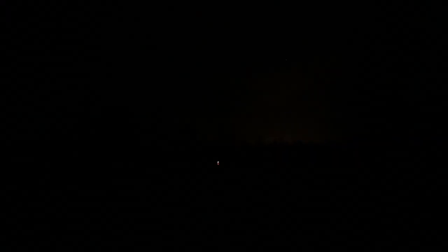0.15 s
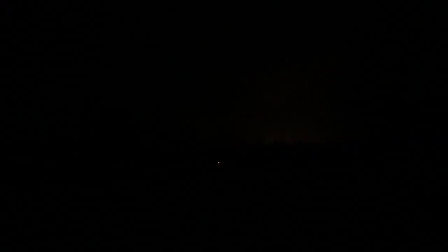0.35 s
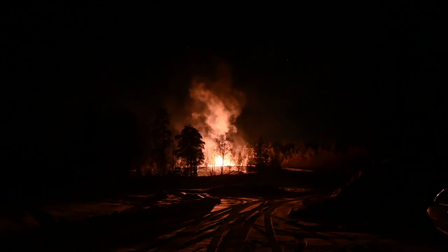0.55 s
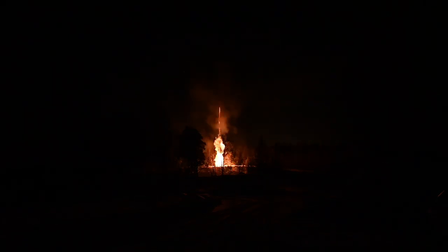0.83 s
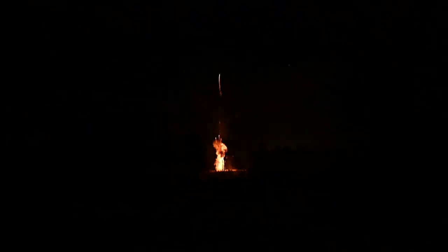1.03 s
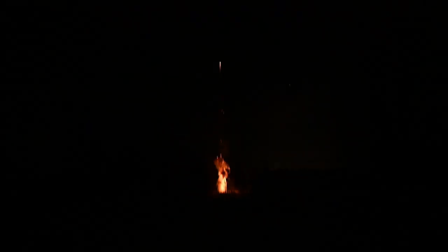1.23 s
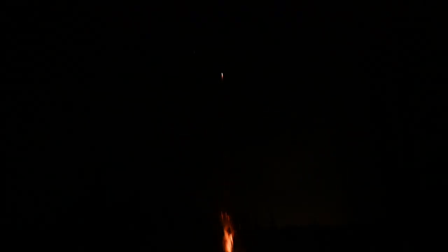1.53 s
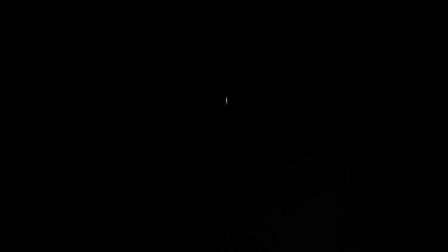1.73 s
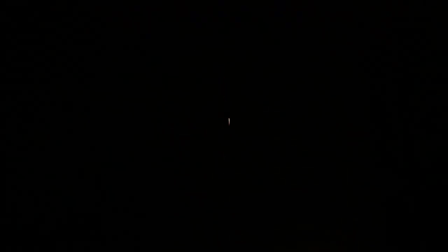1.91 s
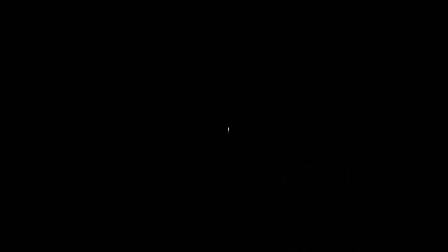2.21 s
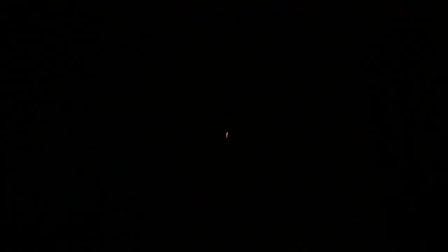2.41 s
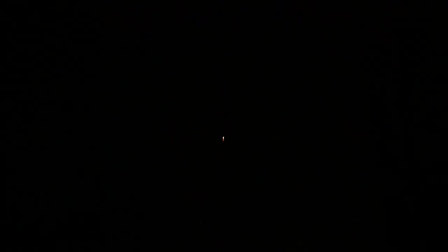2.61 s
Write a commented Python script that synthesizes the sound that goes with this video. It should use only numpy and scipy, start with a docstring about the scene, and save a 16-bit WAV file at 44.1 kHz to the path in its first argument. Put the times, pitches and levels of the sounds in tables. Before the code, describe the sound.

Firework shell launch over an open night field. Quiet low wind and faint hiss; small pops near 0.5 s, a fuse sizzle swelling to a dry, sharp crack at 0.64 s, its dull echo rolling back by 0.9 s. A low thump at 1.06 s leads into a brief, hollow, distorted blast at 1.1 s, with momentary dropouts and pops until 1.2 s. Loud, uneven rumble continues to 2.7 s, losing treble, with faint ticks.

```python
"""Firework shell leaving its mortar

A large shell is fired across an open field at night. Short pops (damped rings) and the sizzle of the fuse (coloured
noise) lead to a sharp crack (one steep pressure cycle) with a ringing tail, which rolls back from the field. After a
low thump the lift blast (a ringing tube under a roar of gas) overloads the microphone; the level drops out twice for
a moment, and a rumble of noise echoes rolls on, slowly losing its treble. Low wind rumble and faint hiss lie below."""
import sys
import numpy as np
from scipy import signal
from scipy.fft import rfft, irfft
from scipy.io import wavfile
from scipy.ndimage import uniform_filter1d

SR = 44100
rng = np.random.default_rng(int(sys.argv[2]) if len(sys.argv) > 2 else 0)


def unload_wav(signal):
    """Save mono or channel-first audio to the path in sys.argv[1] as 16-bit WAV at rate SR, clipped to [-1, 1]."""
    wavfile.write(
        sys.argv[1],
        SR,
        np.round(np.clip(np.atleast_2d(signal).T, -1, 1) * 32767).astype(np.int16),
    )


N = 121275  # samples, 2.75 s


def undb(db):
    """Amplitude ratio of a level: 20 dB per factor of ten."""
    return 10 ** (np.asarray(db) / 20)


def seconds():
    """Time axis in seconds: sample index over sampling rate."""
    return np.arange(N) / SR


def curve(rows, col=1):
    """Linear interpolation in time of one table column; column 0 holds the seconds."""
    rows = np.array(rows)
    return np.interp(seconds(), rows[:, 0], rows[:, col])


def walk(rate):
    """Slow random modulation: levels held for 1 / rate seconds, smoothed by two moving averages."""
    hold = int(SR / rate)
    steps = np.repeat(rng.standard_normal(N // hold + 1), hold)
    smooth = uniform_filter1d(uniform_filter1d(steps, hold), hold)
    return 1.3 * smooth[:N]


def band(hz, octaves):
    """Band noise: white noise under a Gaussian window on the log-frequency axis, scaled to rms 1."""
    f = np.maximum(np.arange(N // 2 + 1) * SR / N, 1)
    window = np.exp(-(np.log2(f / hz) / octaves) ** 2 * 2)
    noise = irfft(rfft(rng.standard_normal(N)) * window, N)
    return noise / np.std(noise)


def coloured(tone, flicker_db, rate, treble_db=0., bass_db=0.):
    """Spectral synthesis: half-octave noise bands follow a colour table and flicker independently."""
    treble_hz, bass_hz = 3470, 250  # treble_db applies in full at treble_hz, bass_db below bass_hz
    tilt_power = 0.97  # the treble tilt in dB grows as this power of frequency
    tone = np.array(tone)
    out, power = 0, 0
    for hz in 28 * 2 ** np.arange(0, 9.4, .5):
        density_db = np.interp(np.log(hz), np.log(tone[:, 0]), tone[:, 1], -99, -99)
        gain = undb(density_db) * np.sqrt(hz)  # bandwidth is proportional to frequency
        tilt_db = bass_db if hz < bass_hz else treble_db * min(hz / treble_hz, 2.8) ** tilt_power
        out = out + gain * undb(tilt_db + flicker_db * walk(rate)) * band(hz, .5)
        power = power + gain ** 2
    return out / np.sqrt(power)


def blast():
    """Tube resonance: the mortar rings, its pitch dropping and steadying as the shell clears the tube."""
    start_s, length_s, rise_s, fall_s = 1.0985, .036, .010, .006
    tube_hz, tube_end_hz, settle_s = 590, 405, .020  # nominal pitches, and when the change is halfway
    wobble = .33  # depth of the random pitch deviation
    gas_hz, gas_db = 1460, -9  # the roar, before its unsteady weighting
    thump_hz, thump_db = 213, -9.5
    t = seconds() - start_s
    wild = 1 / (1 + np.exp(np.clip((t - settle_s) / .003, -30, 30)))  # from 1 to 0 as the pitch settles
    hz = tube_end_hz + (tube_hz - tube_end_hz) * wild
    hz = hz * np.exp(wobble * (.2 + wild) * walk(500))
    ring = np.sin(2 * np.pi * np.cumsum(hz) / SR)
    gas = (0.3 + wild) * undb(gas_db + 4.7 * walk(200)) * band(gas_hz, 1.26)
    thump = undb(thump_db) * band(thump_hz, 0.97)
    shape = np.clip(t / rise_s, 0, 1) * np.clip((length_s - t) / fall_s, 0, 1)
    return shape ** 2 * (ring + gas + thump)


def crack():
    """Pressure pulse: a single steep cycle, rarefaction first, over in under a millisecond."""
    start_s, level_db, cycle_hz = .64432, 6, 1350  # level before overload
    turn = np.clip((seconds() - start_s) * cycle_hz, 0, 1)
    return -undb(level_db) * np.sin(2 * np.pi * turn) * (1 - .3 * turn)


def pops():
    """Damped resonance: short pops, the crack's ringing tail and a low thump, each dip first with a noisy tail."""
    # Each row: start in seconds, ring level in dB before decay and overload, pitch in Hz, ring t60 in seconds,
    # tail level in dB before decay, tail t60 in seconds, tail centre in Hz.
    pop_rows = [(0.4873, -14.5, 2660, 0.0073, -32, 0.074, 2220), (0.5565, -24, 2900, .004, -53, .04, 3000),
                (.6452, -15.5, 560, 0.025, -17.5, 0.11, 1300),
                (0.7143, -12, 1410, 0.0056, -33.5, 0.037, 1800),
                (1.0631, 1.5, 444.4, 0.013, -19.5, 0.044, 1500), (1.1725, -5, 1210, 0.0039, -40, .02, 1500),
                (1.1902, 5.5, 1120, 0.0051, -24, 0.011, 4000)]
    tail_octaves, rise_cycles = 1.75, 0.24
    out = np.zeros(N)
    for s, db, hz, ring_s, tail_db, tail_s, tail_hz in pop_rows:
        t = np.maximum(seconds() - s, 0)
        rise = 1 - np.exp(-t * hz / rise_cycles)
        out += -rise * undb(db - 60 * t / ring_s) * np.sin(2 * np.pi * hz * t)
        out += rise * undb(tail_db - 60 * t / tail_s) * band(tail_hz, tail_octaves)
    return out


def sizzle():
    """Combustion noise: the fuse burns into the charge as coloured noise of changing level and treble."""
    # Each row: time in seconds, level in dB, treble lift in dB.
    burn = [(.53, -53.5, -1), (.574, -49, 0), (.581, -43.5, 2.5), (.603, -44.5, 4), (.612, -29.5, -4),
            (.626, -28.5, 2.5), (.634, -32, -4), (.642, -14, -4), (.646, -60, 1)]
    # Each row: frequency in Hz, spectral density in dB per Hz (relative).
    burn_tone = [(400, -20), (600, 0), (1100, 8), (2500, 0.5), (5500, -10), (8000, -24), (12000, -22),
                 (15800, -36.5)]
    return undb(curve(burn)) * coloured(burn_tone, 2.8, 200, curve(burn, col=2))


def roll(rows, tone):
    """Diffuse reflection: echoes too dense to separate are noise whose level and tilt follow a table."""
    surge_db, flicker_db = 0.58, 1.14  # random swing of the whole, and of each band
    t, mean = seconds(), np.mean(rows, axis=0)
    fade_in = np.clip((t - rows[0][0]) / .02 + 1, 0, 1)
    fade_out = np.clip((rows[-1][0] - t) / .02 + 1, 0, 1)
    treble_db = curve(rows, col=2) - mean[2]  # the tone table already holds the mean colour
    bass_db = curve(rows, col=3) - mean[3]
    noise = coloured(tone, flicker_db, 15, treble_db, bass_db)
    return fade_in * fade_out * undb(curve(rows) + surge_db * walk(29.8)) * noise


def blast_roll():
    """Air absorption: the echoes of the blast grow duller with distance as air takes the treble."""
    # Each row: time in seconds, level in dB, treble and bass in dB against that level.
    echoes = [(1.15, -31.5, -8, -1.5), (1.188, -22, -9, -11), (1.296, -18, -12.5, -22.5),
              (1.398, -18, -18.5, -18), (1.556, -18, -19, -17), (1.61, -16, -22, -30),
              (1.622, -19.5, -22, -15.5), (1.646, -16.5, -21, -20.5), (1.738, -19, -21.5, -21),
              (1.808, -15, -27, -24), (1.87, -18, -24, -21), (2.048, -18.5, -30.5, -17),
              (2.102, -17, -31, -24), (2.194, -19.5, -28.5, -17), (2.288, -15.5, -34, -11),
              (2.434, -17, -40.5, -14.5), (2.62, -14, -36.5, -18.5), (2.668, -23, -29.5, -10),
              (2.682, -15.5, -38, -19), (2.74, -19, -38, -8.5)]
    # Each row: frequency in Hz, spectral density in dB per Hz (relative).
    echo_tone = [(60, -46), (100, -19.5), (190, -9.5), (280, 1), (470, -0.5), (800, -3.5), (1200, -8.5),
                 (2300, -23), (5000, -49.5), (12000, -92.5), (16000, -92.5)]
    return roll(echoes, echo_tone)


def crack_roll():
    """Reverberation in the open: the crack rolls back from the field as dense echoes."""
    # Each row: time in seconds, level in dB, treble and bass in dB against that level.
    echoes = [(.69, -37.5, -15.5, -17), (.74, -37.5, -1, -3), (.8, -28.5, -4, 2), (.87, -22, -9.5, 2),
              (.95, -23, -11.5, -19), (1.04, -24, -16.5, 8), (1.075, -30, -11.5, 0),
              (1.095, -27, -18.5, -2)]
    # Each row: frequency in Hz, spectral density in dB per Hz (relative).
    echo_tone = [(150, -27), (250, -16.5), (518, -1), (746, -4), (1150, -6), (1280, -10.5), (1840, -9.5),
                 (4300, -30), (8760, -66.5), (15800, -74)]
    return roll(echoes, echo_tone)


def overload(x):
    """Clipping: the capsule limits, its flat tops sag back to rest, and the amplifier limits again."""
    # Overload ceiling. Each row: time in seconds, level in dB.
    ceiling = [(0, 4), (1.07, 0), (1.1, -7.1), (1.3, -7.1), (1.7, -5), (2.75, -5)]
    droop_hz, headroom = 130, 1.12  # headroom: capsule limit over amplifier limit
    top = undb(curve(ceiling))
    capsule = np.clip(x, -headroom * top, headroom * top)
    sag = signal.butter(1, droop_hz, "high", fs=SR, output="sos")
    return np.clip(signal.sosfilt(sag, capsule), -top, top)


def ticks():
    """Impulses: faint treble ticks are two-sided exponential clicks stripped of body by a high-pass."""
    # Each row: time in seconds, click level in dB before the high-pass and its make-up gain.
    tick_rows = [(1.0625, -29), (1.2294, -18), (1.4794, -31), (1.6038, -39), (1.6621, -46), (2.03, -43),
                 (2.2802, -56), (2.3206, -39), (2.345, -45), (2.4604, -47), (2.5309, -35), (2.586, -48),
                 (2.6125, -48)]
    cutoff_hz, decay_s = 3500, 0.000084
    t = seconds()
    clicks = sum(undb(db) * np.exp(-np.abs(t - s) / decay_s) for s, db in tick_rows)
    high_pass = signal.butter(2, cutoff_hz, "high", fs=SR, output="sos")
    return 5.3 * signal.sosfilt(high_pass, clicks)


def wind():
    """Turbulent pressure: low wind rumble whose level follows a table, dipping after loud sounds."""
    # Each row: time in seconds, level in dB.
    levels = [(0.0, -42.5), (0.21, -30), (0.32, -33.5), (0.36, -29.5), (0.5, -36.5), (0.53, -26.5),
              (0.56, -39), (0.63, -31), (0.69, -49.5), (0.98, -28.5), (1.01, -33), (1.04, -28.5),
              (1.08, -36.5), (1.15, -31), (1.25, -51.5), (1.88, -40), (2.01, -34), (2.64, -38), (2.67, -45),
              (2.74, -31)]
    # Each row: frequency in Hz, spectral density in dB per Hz (relative).
    wind_tone = [(18, -25), (28, -11.5), (50, -6.5), (75, -8), (95, -6.5), (125, -7.5), (190, -13.5),
                 (260, -25), (340, -61.5)]
    swing_db = 2  # random swing about the table
    return undb(curve(levels) + swing_db * walk(20)) * coloured(wind_tone, 1.5, 10)


def hiss():
    """Background noise: night air and microphone hiss, its level set by a table that sinks after loud sounds."""
    # Each row: time in seconds, level in dB relative to base_db.
    fade = [(0, 1.5), (.64, 5), (.66, -28), (1.0, 10), (1.1, -13), (2.0, -11), (2.75, -6)]
    # Each row: frequency in Hz, spectral density in dB per Hz (relative).
    hiss_tone = [(200, -19), (300, -2), (420, -10.5), (770, -12.5), (1500, -25), (2500, -40), (4500, -48),
                 (8000, -43.5), (15800, -44.5)]
    base_db = -46
    return undb(base_db + curve(fade)) * coloured(hiss_tone, .6, 8.9)


def scene():
    """Superposition: the firework passes through the overload; ticks, wind and hiss add linearly."""
    fire = blast() + crack() + pops() + sizzle() + blast_roll() + crack_roll()
    return (overload(fire) + ticks() + wind() + hiss())[None]


def record(dry):
    """Gating and band limiting: two brief dropouts after the blast, full-scale clipping, a low-pass."""
    # Dropouts. Each row: start in seconds, end in seconds, depth in dB.
    blanks = [(1.135, 1.148, -19.5), (1.159, 1.164, -48)]
    top_hz = 15800
    t = seconds()
    blank_db = sum(db * np.clip(np.minimum(t - a, b - t) / .001, 0, 1) for a, b, db in blanks)
    clipped = np.clip(dry * undb(blank_db), -1, 1)
    low_pass = signal.ellip(10, .2, 80, top_hz, fs=SR, output="sos")
    return signal.sosfilt(low_pass, clipped)


dry = scene()
out = record(dry)
unload_wav(out)
```